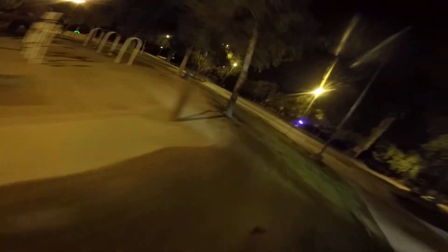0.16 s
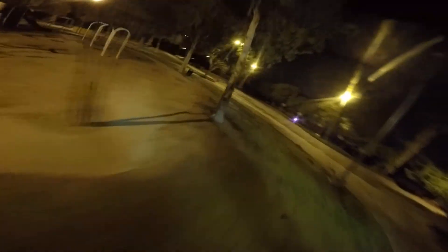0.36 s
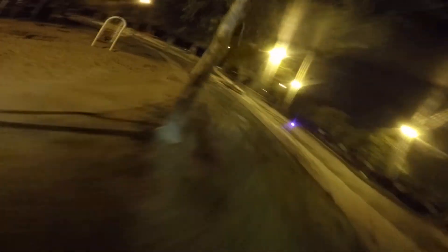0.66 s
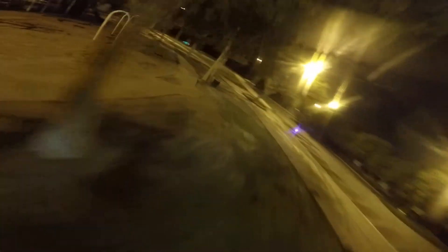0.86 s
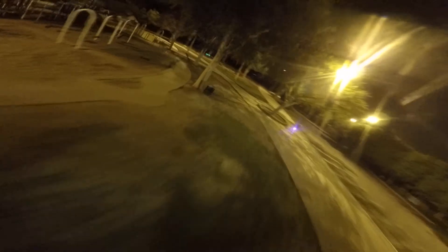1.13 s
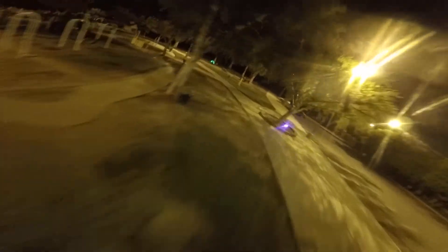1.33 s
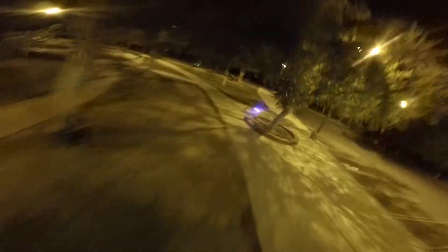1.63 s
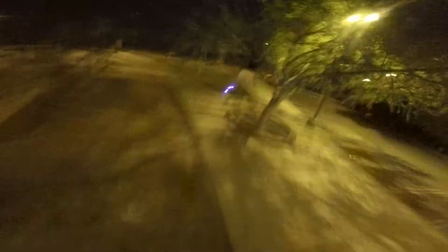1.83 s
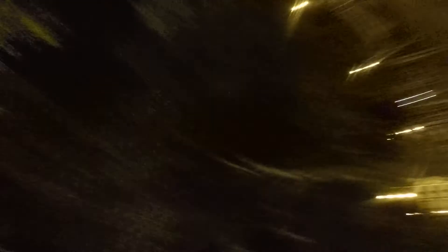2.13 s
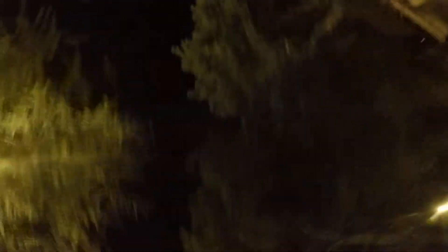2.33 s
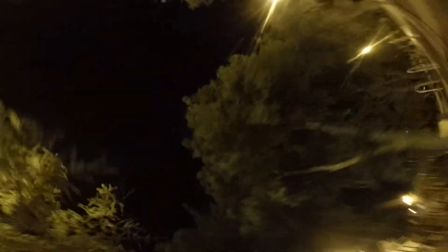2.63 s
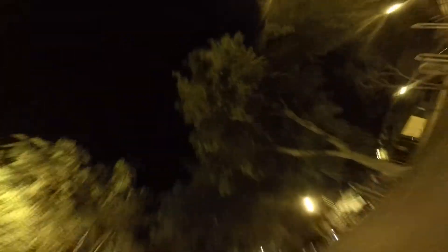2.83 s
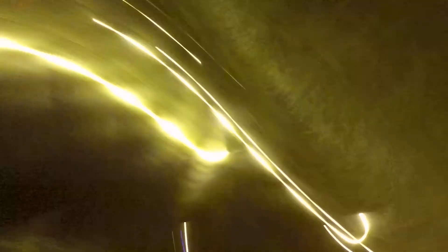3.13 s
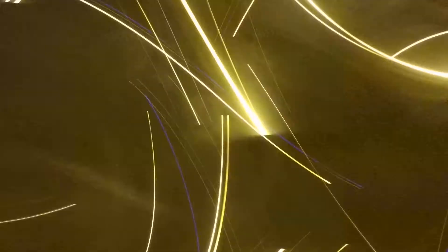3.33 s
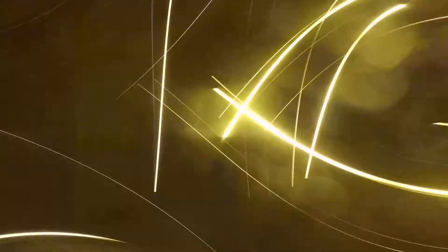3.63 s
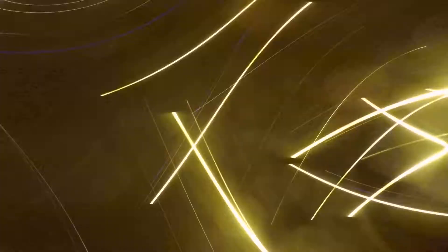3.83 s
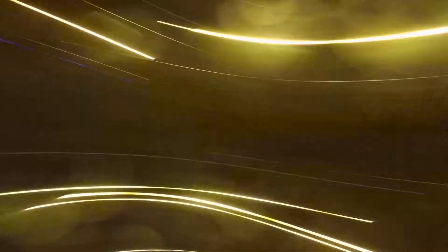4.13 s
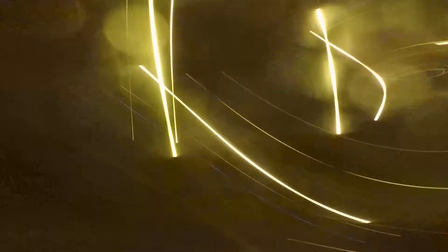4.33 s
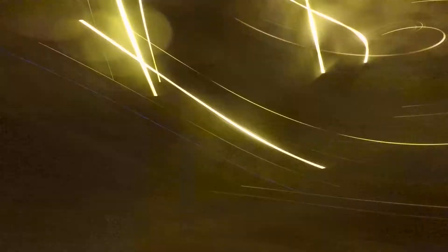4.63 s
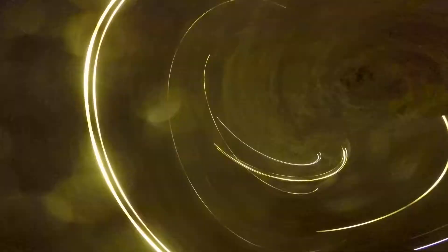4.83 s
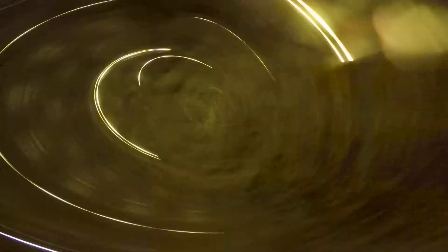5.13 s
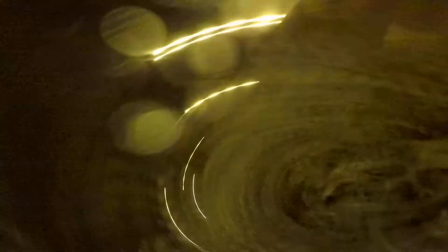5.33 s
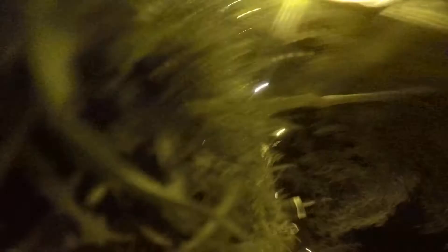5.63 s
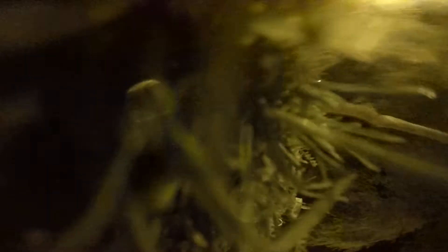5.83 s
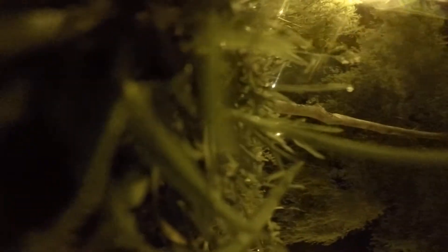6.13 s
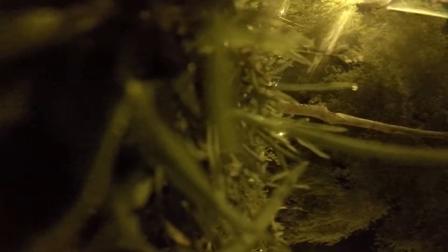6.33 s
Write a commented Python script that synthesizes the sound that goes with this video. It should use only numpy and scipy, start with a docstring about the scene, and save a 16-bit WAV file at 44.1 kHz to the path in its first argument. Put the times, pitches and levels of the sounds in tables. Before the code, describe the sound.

A small racing drone whines in shifting pitches over rushing wind, heard from its own camera outdoors. It hits a branch with a sharp clatter, the motors surge unevenly, and a second crash cuts them off. The camera spins away with a fast, crackling flutter of air, lands with a hard knock and bounces to rest in rustling grass. Another drone whines faintly in the distance.

```python
"""Four three-bladed rotors of a small racing drone whine in the rushing night air, heard from its camera.
Each sounds harmonics of its shaft rate over the broadband noise of turbulence. The drone strikes a branch,
fights for balance and strikes again, and the blows ring the camera case. The camera spins off, its port
fluttering in the air once a turn, bounces and comes to rest in rustling grass while another drone nears."""
import sys
import numpy as np
from scipy import signal
from scipy.fft import rfft, irfft, next_fast_len
from scipy.io import wavfile
from scipy.ndimage import uniform_filter1d, map_coordinates

SR = 44100
rng = np.random.default_rng(int(sys.argv[2]) if len(sys.argv) > 2 else 0)


def pcm_store(signal):
    """Save signal as 16-bit PCM."""
    levels = np.round(np.clip(np.atleast_2d(signal), -1, 1) * 32767)
    wavfile.write(sys.argv[1], SR, levels.astype(np.int16).T)


N = 285327

# Air in flight. Each row: time in seconds, then relative levels in dB of headwind, blade hiss, buffeting.
FLIGHT_AIR = [(0, -20.5, -35.5, -22.5), (.45, -19.5, -35, -22), (.65, -19, -30.5, -16.5),
              (.95, -19.5, -29, -16), (1.1, -20.5, -30, -22), (1.4, -21, -35, -20.5),
              (1.6, -26.5, -31, -20.5), (1.8, -32, -39.5, -23), (2.039, -31, -32, -31.5),
              (2.15, -31.5, -25.5, -26), (2.5, -34.5, -29, -31.5), (2.86, -36, -32, -23.5),
              (2.97, -44.5, -56, -22.5)]
# Night air and the far drone's wash. Each row: time in seconds, level in dB.
FAR_AIR = [(3.2, -41), (4.1, -59), (5.7, -62.5), (6.2, -49.5), (6.47, -45.5)]
# Spectra of slow air and of crackling air at the port. Each row: frequency in Hz, relative level in dB.
HEAVE_SPECTRUM = [(8.8, -30.5), (15, 2.5), (97, -9), (278, -28), (500, -61.5), (650, -93), (1100, -120)]
CRACKLE_SPECTRUM = [(88, -10.5), (150, 8), (189, -4.5), (505, -5.5), (818, -10.5), (1180, -14), (1600, -18),
                    (2270, -19), (15000, -61)]


def amp(db):
    return 10 ** (np.asarray(db) / 20)


def unit(x):
    return x / np.sqrt(np.mean(x ** 2) + 1e-20)


def curves(rows, outside=None):
    """Linear interpolation: one value per sample for each column after the time."""
    s, *columns = np.transpose(rows)
    return [np.interp(np.arange(N) / SR, s, column, outside, outside) for column in columns]


def wobble(rate):
    """A smooth random curve through rate knots a second."""
    return map_coordinates(rng.standard_normal(int(N * rate / SR) + 4), [np.arange(N) * rate / SR])


def filtered(x, response):
    """Linear filtering: the spectrum of x times a frequency response."""
    size = next_fast_len(N + SR // 2)
    return irfft(rfft(x, size) * response(np.fft.rfftfreq(size, 1 / SR)), size)[:N]


def dulled(x, corner_hz):
    """Third-order low-pass filtering, scaled to rms 1."""
    return unit(filtered(x, lambda hz: 1 / (1 + (hz / corner_hz) ** 3)))


def noise(spectrum, patchy_db):
    """Coloured noise of rms 1, its gain varying in random patches of time and frequency."""
    bins = signal.stft(rng.standard_normal(N + 512), nperseg=512)[2]
    patches = uniform_filter1d(uniform_filter1d(rng.standard_normal(bins.shape), 6, 0), 8, 1)
    patchy = signal.istft(bins * amp(patchy_db * unit(patches)), nperseg=512)[1][:N]
    knots_hz, db = np.transpose(spectrum)
    return unit(filtered(patchy, lambda hz: amp(np.interp(np.log(hz + 1), np.log(knots_hz + 1), db))))


def rotor(rows, partials, unsteady, flutter_db):
    """Periodic blade forces radiate shaft harmonics; turbulence modulates their speed and strength."""
    # Each row: time in seconds, blade rate in Hz, tone level in dB, optionally motor whine level in dB.
    blades, magnet_steps = 3, 42
    on = slice(round(rows[0][0] * SR), round(rows[-1][0] * SR))
    hz, db, *whine_db = [curve[on] for curve in curves(rows)]
    shaft = 2 * np.pi * np.cumsum(hz * (1 + unsteady * wobble(70)[on])) / (blades * SR)
    tone = sum(amp(level + 4 * wobble(60)[on]) * np.sin(magnet_steps * shaft) for level in whine_db)
    for k, level in partials:
        depth_db = 1.8 if k == blades else flutter_db  # the blade tone is the steadiest
        tone += amp(db + level + depth_db * wobble(90)[on]) * np.sin(k * shaft)
    out = np.zeros(N)
    out[on] = np.sqrt(2) * signal.windows.tukey(len(hz), 900 / len(hz)) * tone
    return out


def near_drone():
    """Rotor tones grow as a power of speed and sink under the headwind; blades favour every third one."""
    # Each row: multiple of the shaft rate, relative level in dB.
    partials = [(1, -20), (2, -24.5), (3, -2), (6, -16), (9, -18.5), (12, -21), (15, -19.5), (18, -23),
                (21, -24.5), (24, -30)]
    # Each row: time in seconds, blade rates in Hz of the slowest rotor and of the one whose motor whines.
    cruise = np.array([(0, 608, 665), (0.199, 547, 621), (.45, 541, 607), (0.601, 620, 683),
                       (.8, 665, 732.4), (1, 683, 735), (1.18, 654, 698), (1.41, 640.5, 707.4),
                       (1.6, 657.6, 710), (1.68, 629, 709), (1.75, 561, 615), (1.82, 495, 542)])
    # Single rotors. Each row: time in seconds, blade rate in Hz.
    outer = [(1.2, 750), (1.3, 760), (1.6, 748), (1.7, 706)]  # heard late in the bend
    racing = [(1.94, 738), (1.995, 739), (2.026, 901.5), (2.087, 835), (2.199, 876), (2.3, 880),
              (2.35, 809), (2.45, 745), (2.55, 682), (2.64, 632), (2.699, 668.4), (2.74, 649), (2.8, 670.4),
              (2.861, 666), (2.949, 602.6)]  # after the first strike
    stalling = [(2, 709), (2.05, 470), (2.1, 338.4), (2.2, 404), (2.3, 394.7), (2.4, 571), (2.55, 671.4),
                (2.74, 687), (2.871, 662)]
    idling = [(2.08, 325), (2.18, 332), (2.29, 349)]
    steady = [(2.45, 688.7), (2.55, 705), (2.64, 732.4), (2.7, 696), (2.78, 703)]  # the whining motor again
    # One row per entry of rates. Each row: level at the hover rate in dB, growth in dB per octave.
    tones = [(-21, 14), (-25.5, 10.5), (-21, 12), (-21, 16.5), (-23, 14.5), (-27, 6.5), (-30, 14)]
    rates = [cruise[:, [0, 1]], outer, racing, stalling, idling, cruise[:, [0, 2]], steady]
    hover_hz, sink_db_per_db = 700, 0.5
    air_s, rush_db, *_ = np.transpose(FLIGHT_AIR)
    out = np.zeros(N)
    for k, (rows, (db, growth_db)) in enumerate(zip(rates, tones)):
        s, hz = np.transpose(rows)
        octaves = np.log2(hz / hover_hz)
        headwind_db = np.interp(s, air_s, rush_db) - rush_db.mean()
        tone_db = db + growth_db * octaves - sink_db_per_db * headwind_db
        whine_db = [-53.5 + 24.5 * octaves] if k >= 5 else []
        out += rotor(np.transpose([s, hz, tone_db, *whine_db]), partials, unsteady=.0065, flutter_db=3.5)
    return out


def air():
    """Turbulence makes broadband noise: headwind, blade hiss and port buffeting gust over the night air."""
    # Spectra. Each row: frequency in Hz, relative level in dB.
    rush_spectrum = [(120, -8.5), (200, -4), (317, -8), (650, -4.5), (894, -4), (2110, -6), (4190, -13.5),
                     (9000, -34), (11700, -55), (19800, -120)]
    hiss_spectrum = [(590, -24.5), (1000, -15), (2390, -5), (2620, -3), (5380, -2.5), (8360, -13.5),
                     (14800, -24.5), (15500, -26), (16000, -59)]
    buffet_spectrum = [(8.8, -39), (15, -0.5), (32, -5), (51, 0.5), (137, -8.5), (317, -16.5), (400, -18.5),
                       (520, -36.5), (880, -120)]
    night_spectrum = [(59, -34), (100, -2), (391, -10), (1210, -17), (2270, -30), (3840, -31.5),
                      (15000, -48.5)]
    rush_db, hiss_db, buffet_db = curves(FLIGHT_AIR, outside=-200)
    gust = wobble(25)
    rush = amp(rush_db + 4 + .2 * gust + .4 * wobble(150)) * noise(rush_spectrum, patchy_db=1)
    hiss = amp(hiss_db + 2.5 + .24 * gust) * noise(hiss_spectrum, patchy_db=2)
    lumps = amp(.8 * gust + 1.5 * wobble(12))
    buffet = amp(buffet_db + 3) * unit(lumps * noise(buffet_spectrum, patchy_db=3))
    night = amp(curves(FAR_AIR)[0]) * noise(night_spectrum, patchy_db=.6)
    return rush + hiss + buffet + night


def cracks():
    """Impact excitation: twigs and ground give rough noise bursts that ring the modes of the case."""
    # Each row: time in seconds, relative level in dB, time to fall 60 dB in seconds.
    impacts = [(1.826, 7, 0.0085), (1.834, 0.5, 0.081), (1.872, -4.5, 0.048), (1.888, -4, 0.046),
               (1.901, -6, 0.027), (1.916, -12, .06), (1.926, -5, 0.064), (1.932, -5, .045), (2.9, 2, .068),
               (2.907, -4, .054), (2.928, -8, 0.035), (2.93, -1.5, .045), (2.936, -9.5, 0.078),
               (2.965, 5.5, 0.019), (2.970, 9.5, .013), (2.974, -11, 0.043), (3.181, -23, .075),
               (3.193, -19, .044), (3.588, 1.5, 0.013), (3.594, -27.5, .025), (4.121, -20, .023),
               (4.128, -10, 0.013), (4.7956, 5.5, .011), (5.007, -9, .011), (5.243, -16, 0.017),
               (5.321, -34, 0.022), (5.427, -32.5, 0.16), (5.454, -15.5, 0.019), (5.463, -20.5, 0.05),
               (5.548, -36, 0.031), (5.817, -40.5, .017), (5.929, -45.5, .015), (6.007, -40, .014)]
    # Each row: frequency in Hz, relative level in dB.
    spectrum = [(350, -25), (600, 7.5), (791, -4.5), (1200, 1.5), (1790, -5), (4770, -10.5), (14400, -17.5),
                (16300, -36)]
    # Each row: resonance frequency in Hz, bandwidth in Hz, gain in dB.
    case_modes = [(990, 83, -8.5), (2030, 300, -8.5), (4300, 1600, -2)]
    t, envelope, snaps = np.arange(N) / SR, np.zeros(N), np.zeros(N)
    for s, db, t60 in impacts:
        rise_s = .0001 + .036 * t60
        below_peak_db = np.where(t < s, 9 * (s - t) / rise_s, 60 * (t - s) / t60)
        envelope += amp(db - 11.5 - np.clip(below_peak_db, 0, 300))
        snaps[round(s * SR)] += amp(db + 12) * np.exp(-(rise_s / .0018) ** 2)  # sudden blows hit hardest
    bursts = envelope * amp(3.5 * wobble(900)) * noise(spectrum, patchy_db=2.5)

    def case_response(f):
        return sum(amp(db) * 1j * f * width / (hz * hz - f * f + 1j * f * width)
                   for hz, width, db in case_modes)
    return bursts + filtered(bursts + snaps, case_response)


def thumps():
    """Damped oscillation: a shove swings the microphone's membrane, which slows as it settles."""
    # Each row: start in seconds, level in dB, nominal frequency in Hz, decay scale in cycles, direction.
    shoves = [(1.828, 4.5, 230, 6.3, -1), (1.826, -0.5, 30, 2.1, 1), (1.881, -5, 90, 5.4, 1),
              (1.899, -2.5, 132.4, 4.7, 1), (2.901, -2, 91, 6, 1), (2.933, 5.5, 59, 2.4, 1),
              (2.957, -2.5, 513, 16, 1), (2.968, -6, 151, 9.3, -1), (2.979, -4, 71, 8.9, 1),
              (3.12, -12, 34.8, 8.6, 1), (3.586, -9, 258, 2.1, -1), (4.504, -10.5, 45.4, 9, 1),
              (4.775, -8, 115, 3.7, -1), (4.7964, 5, 300, 7.5, -1), (5.008, -3.5, 125, 2.3, 1),
              (5.243, -13.5, 127, 6.6, -1), (5.322, -17.5, 90, 6.3, 1), (5.463, -6.5, 80.6, 6, -1)]
    t, out = np.arange(SR // 4) / SR, np.zeros(N + SR)
    for s, db, hz, life, direction in shoves:
        cycles = np.log1p(1.245 * hz * t) / .9
        envelope = amp(db - 60 * hz * t / (1.6 * life)) * np.tanh(9 * cycles)
        out[round(s * SR):][:len(t)] += np.sign(direction) * envelope * np.sin(2 * np.pi * cycles)
    return out[:N]


def heave():
    """Pressure fluctuations of slow air rumble on the loose camera."""
    # Each row: time in seconds, relative level in dB.
    pressure = [(2.97, -19), (3.04, -19.5), (3.09, -42), (3.14, -24.5), (4.1, -19.5), (4.15, -28.5),
                (4.4, -22), (4.44, -35.5), (4.65, -23), (4.82, -22.5), (4.87, -36.5), (4.98, -28),
                (5.06, -47.5), (5.15, -32), (5.21, -47), (5.7, -55), (6.47, -46)]
    return amp(curves(pressure, outside=-200)[0] + 3) * noise(HEAVE_SPECTRUM, patchy_db=2.04)


def rustle():
    """Friction: leaves and stalks scratch over the case in clumps of tiny clicks, and a few squeak."""
    # Each row: loudest moment in seconds, level in dB, time to fall 60 dB in seconds.
    brushes = [(3.0, -42.5, 0.34), (3.065, -44, .06), (3.19, -46, 0.19), (4.98, -50.5, 0.082),
               (5.01, -46, 0.17), (5.24, -49, 0.1), (5.28, -55, 0.084), (5.32, -46.5, 0.12),
               (5.4, -52.5, .15), (5.455, -39.5, .15), (5.54, -53, 0.26), (5.6, -61, .15),
               (5.82, -59.5, 0.23), (5.95, -62.5, 0.6)]
    # Each row: frequency in Hz, relative level in dB.
    spectrum = [(470, -30.5), (800, -3.5), (862, -19.5), (2000, -8.5), (2210, -20), (2910, -8.5),
                (13100, -18), (16000, -25)]
    # Each row: time in seconds, level in dB, frequency in Hz.
    squeaks = [(5.04, -50, 6300), (5.28, -58, 3600), (5.395, -55, 6300), (5.41, -57, 6200),
               (5.54, -56, 5200)]
    swell_share, squeak_s = .6, .0053  # swelling time over decay time; half-width of a squeak
    t = np.arange(N) / SR
    envelope = amp(-85.5) * (t > 5)  # stalks keep settling faintly
    for s, db, t60 in brushes:
        below_peak_db = 60 * np.where(t < s, (s - t) / swell_share, t - s) / t60
        envelope += amp(db - np.clip(below_peak_db, 0, 300))
    clumps = amp(5.5 * wobble(250) + 4 * wobble(1500))
    scratch = envelope * unit(clumps * noise(spectrum, patchy_db=4))
    squeak = sum(amp(db) * np.exp(-((t - s) / squeak_s) ** 2) * np.sin(2 * np.pi * hz * t)
                 for s, db, hz in squeaks)
    return scratch + squeak * wobble(1300)  # modulation widens each tone into a band


def spin():
    """Amplitude modulation: once a turn the port meets the wind, crackles, and feels a swell and suck."""
    # The camera's rotation, slowed by a bounce. Each row: time in seconds, turns so far.
    rotation = [(3.166, 0), (3.5495, 16), (3.624, 19), (3.655, 20), (3.823, 26), (3.884, 28), (4.154, 37)]
    start, end, edge_s, dull_share = 3.17, 4.14, .023, .6
    edge_db, = curves([(start, -17.5), (start + edge_s, 0), (end - edge_s, 0), (end, -17.5)], outside=-400)
    turn, = curves(rotation)
    turns_per_s = uniform_filter1d(np.gradient(turn) * SR, size=2000)
    dip_db = 3 * np.exp(-((np.arange(N) / SR - 3.85) / .18) ** 2)  # the crackle sags briefly
    crackle_db = -19 - dip_db + edge_db
    throb_db = -17.5 + .43 * (turns_per_s - 34) + edge_db
    live = crackle_db > -200
    shift, width, strength, push = rng.standard_normal((int(turn[-1]) + 2, 4)).T  # each turn differs
    nearest = np.round(turn).astype(int)
    off_wind = turn - nearest - .05 - .06 * shift[nearest]  # in turns
    facing = np.exp(-(off_wind / (.13 * amp(2.2 * width[nearest]))) ** 2) * amp(2.2 * strength[nearest])
    ragged = amp(9.2 * np.tanh(wobble(500))) * (facing + .089 * amp(5.4 * wobble(120)))
    wind = noise(CRACKLE_SPECTRUM, patchy_db=2)
    crackle = ragged * ((1 - dull_share) * wind + dull_share * dulled(wind, corner_hz=2300))
    phase = (turn - .05) % 1
    throb = np.sin(2 * np.pi * 2.02 * phase) * np.sin(np.pi * phase ** .45)
    throb *= amp(.6 * push[(turn - .05).astype(int)])
    return amp(crackle_db) * crackle / np.std(crackle[live]) + amp(throb_db) * throb / np.std(throb[live])


def gusts():
    """Slower flow gives duller turbulence: the tumbling port puffs, and the air heaves on briefly."""
    # Each row: time in seconds, relative level in dB.
    port_gusts = [(4.142, -17.5), (4.158, -25), (4.17, -19.5), (4.182, -24), (4.216, -25), (4.265, -23),
                  (4.32, -16.5), (4.359, -25.5), (4.402, -32.5), (4.437, -35), (4.475, -25.5),
                  (4.508, -12.5), (4.569, -25), (4.613, -28), (4.628, -25), (4.654, -24), (4.686, -31),
                  (4.708, -27.5), (4.734, -27), (4.756, -19), (4.782, -11.5), (4.818, -21), (4.834, -28),
                  (4.903, -33.5)]
    t, envelope = np.arange(N) / SR, np.zeros(N)
    for s, db in port_gusts:
        width_s = .006 * amp(-.15 * (db + 20.5))  # stronger gusts are shorter
        envelope += amp(db - 5.5) * np.exp(-((t - s - .004) / width_s) ** 2)
    lingering = signal.lfilter([.002], [1, -.9985], envelope)
    puffs = envelope * amp(5.3 * wobble(300)) * dulled(noise(CRACKLE_SPECTRUM, patchy_db=-1), corner_hz=880)
    return puffs + amp(.5) * lingering * noise(HEAVE_SPECTRUM, patchy_db=3.5)


def far_drone():
    """Blade-passing harmonics of two distant rotors swell with their wash."""
    # Each row: multiple of the shaft rate, relative level in dB.
    partials = [(3, 0), (6, -5), (9, -16)]
    # One list per rotor. Each row: time in seconds, blade rate in Hz.
    rates = [
        [(6.05, 468), (6.2, 523), (6.32, 638), (6.38, 683), (6.47, 671)],
        [(5.9, 414.5), (6.02, 477), (6.3, 483), (6.38, 529), (6.47, 540)],
    ]
    # Each entry: a rotor's level over the wash in dB.
    over_wash_db = [-8.5, -12.5]
    out = np.zeros(N)
    for rows, db in zip(rates, over_wash_db):
        course = [(s, hz, db + np.interp(s, *np.transpose(FAR_AIR))) for s, hz in rows]
        out += rotor(course, partials, unsteady=.0067, flutter_db=5)
    return out


def scene():
    """Superposition: the pressures of all sources add at one microphone."""
    mono = near_drone() + air() + cracks() + thumps() + heave() + rustle() + spin() + gusts() + far_drone()
    return np.array([mono, mono])


def record(dry):
    """Saturation and band limiting: one microphone clips softly, loses its top and feeds both channels."""
    ceiling, shelf_hz, top_hz = .86, 15300, 16400
    clipped = dry[0] / (1 + np.abs(dry[0] / ceiling) ** 8) ** (1 / 8)
    mono = filtered(clipped, lambda hz: (hz < top_hz) * np.where(hz > shelf_hz, amp(-16), 1))
    return np.array([mono, mono])


dry = scene()
out = record(dry)
pcm_store(out)
```